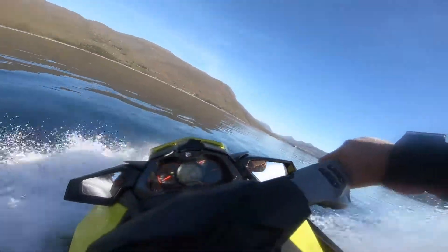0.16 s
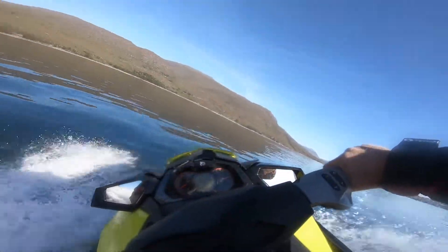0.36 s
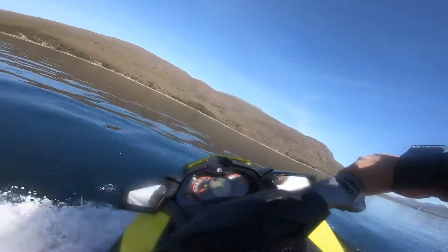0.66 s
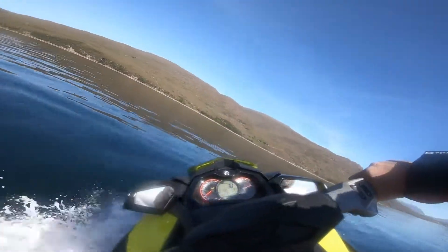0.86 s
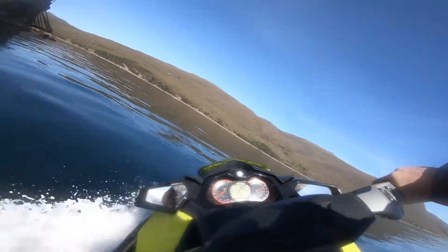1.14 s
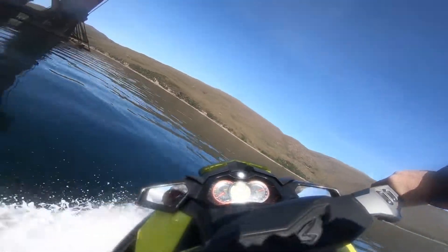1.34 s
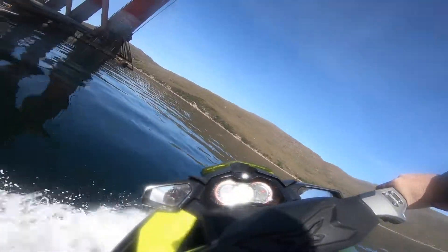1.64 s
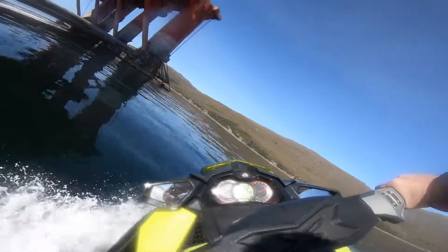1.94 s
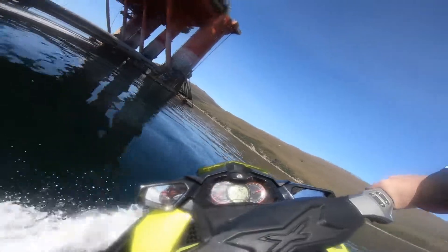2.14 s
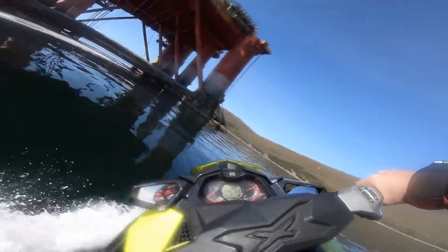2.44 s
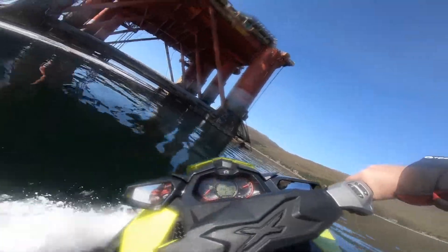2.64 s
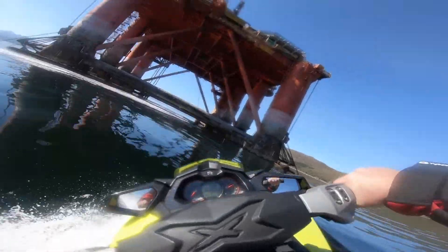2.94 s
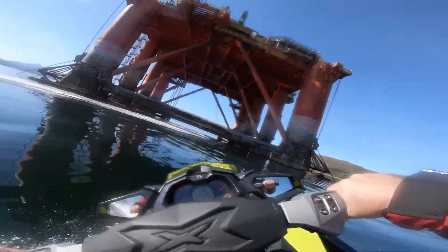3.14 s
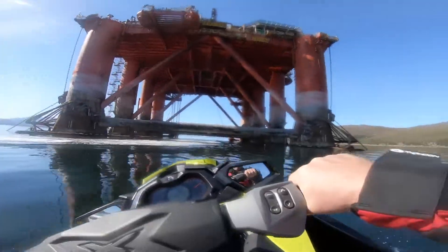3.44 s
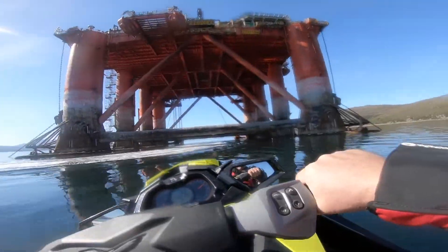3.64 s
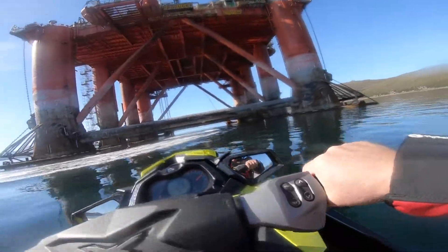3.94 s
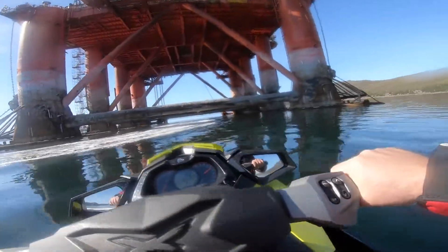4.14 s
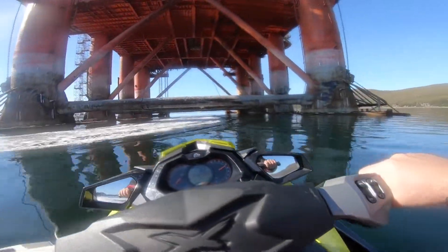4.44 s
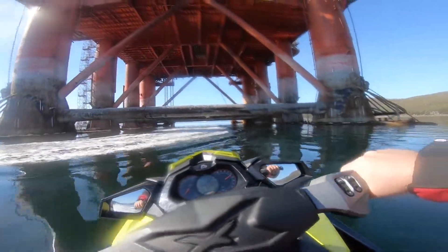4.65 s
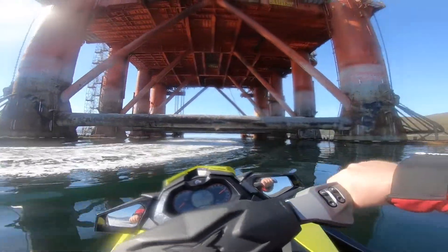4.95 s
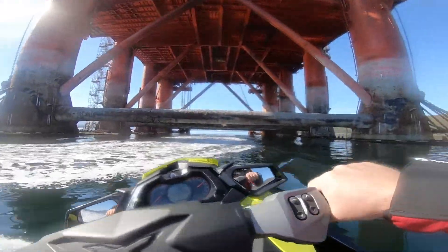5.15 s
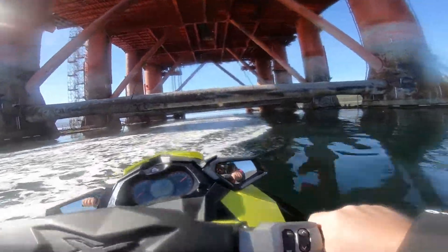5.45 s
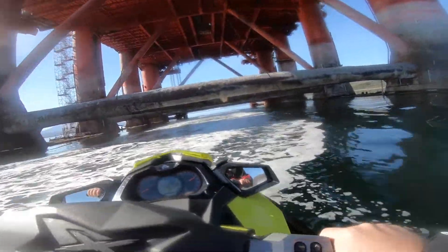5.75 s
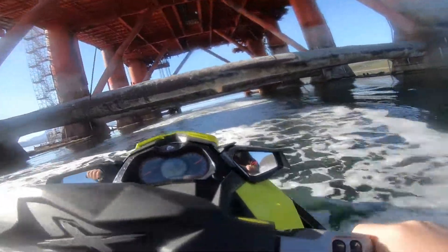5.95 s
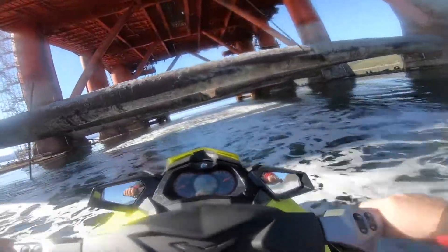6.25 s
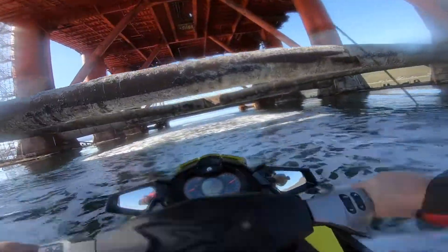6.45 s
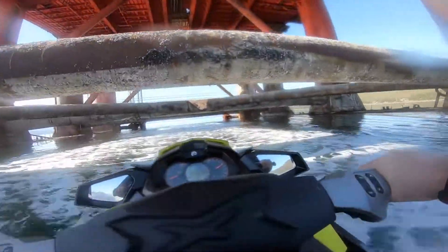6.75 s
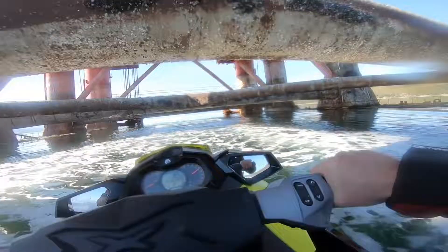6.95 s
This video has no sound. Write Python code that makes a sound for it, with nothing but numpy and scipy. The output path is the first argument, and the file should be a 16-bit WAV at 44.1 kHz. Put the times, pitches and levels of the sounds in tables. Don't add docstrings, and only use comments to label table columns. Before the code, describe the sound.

Low gusty wind and tumbling wash open over an uneven engine note, its deep tone surging and sinking as the pump catches air. Small slaps knock the hull until it rolls upright. Then a steady drone with faint whine and whistling flow, soft spray hiss, one sharp deck rap with bright drops, and closing bubbly gulps. Mono, near and dull, outdoors without echo.

```python
import sys
import numpy as np
from scipy import signal
from scipy.fft import rfft, irfft, next_fast_len
from scipy.io import wavfile

SR = 44100
rng = np.random.default_rng(int(sys.argv[2]) if len(sys.argv) > 2 else 0)


def output_pcm(signal):
    pcm = np.clip(np.atleast_2d(signal).T, -1, 1) * 32767
    wavfile.write(sys.argv[1], SR, np.round(pcm).astype(np.int16))


def linear_from_db(decibels):
    return 10 ** (np.asarray(decibels, float) / 20)


N = 313017
TIME = np.arange(N) / SR


def rms_one(x):
    return x / np.sqrt(np.mean(x ** 2) + 1e-20)


def in_time(rows):
    s, *columns = np.transpose(rows)
    return [np.interp(TIME, s, column) for column in columns]


def swell(depth_db, rate):
    r = np.exp(-80 * np.pi * rate / SR)
    draws = rng.standard_normal(N // 40 + 2002)
    slow = signal.lfilter([1], [1, -2 * r, r * r], draws)[2000:]
    return np.interp(np.arange(N) / 40, np.arange(len(slow)), linear_from_db(depth_db * rms_one(slow)))


def spells(rows, edge_s):
    s = np.arange(0, N + 40, 40) / SR
    gain = 0
    for start, length, db in rows:
        inside = np.minimum(s - start, start + length - s)
        gain = gain + linear_from_db(db) * np.clip(inside / edge_s + .5, 0, 1) ** 2
    return np.interp(TIME, s, gain)


def ring(clicks, hz, t60):
    r = linear_from_db(-60 / (t60 * SR))
    w = 2 * np.pi * hz / SR
    return signal.lfilter([0, np.sin(w)], [1, -2 * r * np.cos(w), r * r], clicks + 1e-18)


def filtered(x, order, hz, kind="low"):
    return signal.sosfilt(signal.butter(order, hz, kind, fs=SR, output="sos"), x)


def coloured(spectrum, shared_db, own_db, rate):
    size = next_fast_len(N)
    hz = np.maximum(np.fft.rfftfreq(size, 1 / SR), 1)
    points = np.array(spectrum)
    height_db = np.interp(np.log(hz), np.log(points[:, 0]), points[:, 1], -150, -150)
    shaped = rfft(rng.standard_normal(N), size) * linear_from_db(height_db)
    together = swell(shared_db, rate)
    place = 2 * np.log2(hz)
    first, last = int(2 * np.log2(points[0, 0])), int(2 * np.log2(points[-1, 0])) + 1
    out = 0
    for centre in range(first, last + 1):
        part = irfft(shaped * np.maximum(1 - np.abs(place - centre), 0), size)[:N]
        out = out + part * swell(own_db, rate)
    return rms_one(out * together)


# time in seconds, speed in turns per s, lean from 0 to 1.
SHAFT = [(0, 43.3, 1), (.3, 43.6, 1), (.75, 46.2, 1), (1.2, 46.5, 1), (1.45, 46.95, 1), (2.5, 47, 1),
         (2.65, 46.5, 1), (3, 47.05, 1), (3.2, 47.8, .4), (3.45, 47.65, 0), (3.6, 47.9, 0), (4.5, 47.9, 0),
         (4.65, 48.05, 0), (5.2, 47.85, 0), (5.55, 48.15, 0), (6.45, 48.45, 0), (6.62, 48.2, 0),
         (7.1, 48.45, 0)]
AERATED_DB = -9


def shaft():
    speed, lean = in_time(SHAFT)
    turn = 2 * np.pi * np.cumsum(speed * swell(.02, 7)) / SR
    return turn, lean


# time in seconds, blade tone in dB.
GRIP = [(0, -36), (.18, -10), (.5, -30), (.9, -34.5), (2.3, -18.5), (2.6, -30), (3.0, -24), (3.3, -21.5),
        (3.46, -18.5), (3.7, -19.5), (4.2, -16.5), (4.62, -20), (4.75, -25), (5.04, -18), (5.25, -28.5),
        (5.4, -21), (6.7, -20.5), (7.0, -32)]
# start in seconds, length in seconds, blade tone in dB.
BITES = [
    (.68, 0.068, -27),
    (1.35, 0.17, -27),
    (1.58, 0.3, -32),
    (2.3, 0.059, -29),
    (2.76, 0.069, -25.5),
    (6.91, 0.07, -21),
]
# start in seconds, length in seconds, level in dB.
SURGES = [(0, 0.56, -28), (2.5, 0.13, -29), (3.1, 0.14, -43), (3.27, 0.22, -33.5), (3.5, 0.37, -22.5),
          (4.38, 0.15, -27), (4.7, 0.055, -35), (4.89, 0.23, -25), (5.18, .12, -18.5), (5.35, 0.096, -27),
          (5.72, 0.13, -27), (6.03, 0.45, -30.5), (6.36, 0.36, -30), (6.57, 0.31, -25.5),
          (6.88, 0.071, -23.5)]


def blade_tones(turn, lean):
    blade = linear_from_db(in_time(GRIP)[0] + AERATED_DB * lean) + spells(BITES, edge_s=.05)
    blade = blade * swell(1.8, 18)
    double = linear_from_db(-34.5) + spells(SURGES, edge_s=.041)
    double = double * linear_from_db(AERATED_DB * lean / 2) * swell(2.2, 14)
    return blade * np.sin(3 * turn) + double * np.sin(6 * turn + 1)


# multiple of shaft speed, level in dB.
UNEVEN = [(2, -12), (4, -5), (5, -3), (7, -23.5), (8, -24)]
# start in seconds, length in seconds, level in dB.
HUNTING = [
    (0, 0.048, -29),
    (.68, 0.18, -22),
    (3.08, 0.17, -25.5),
    (3.3, 0.77, -26),
    (5.0, 0.05, -34.5),
    (5.22, .1, -36),
    (6.98, 0.067, -35),
]


def uneven_firing(turn, lean):
    running_db, leaning_db = -34, -28
    level = linear_from_db(running_db + (leaning_db - running_db) * lean) + spells(HUNTING, edge_s=.11)
    out = 0
    for order, db in UNEVEN:
        out = out + linear_from_db(db) * swell(2, 2.5) * np.sin(round(order) * turn + rng.uniform(0, 2 * np.pi))
    return level * linear_from_db(AERATED_DB * lean) * out


# multiple of shaft speed, running level in dB, leaning level in dB.
WHINE = [(9, -1.5, -10), (10, -2.5, -1.5), (11, -8.5, -12.5), (12, -16.5, -3), (13, -13, -12),
         (15, -12, -13), (16, -11.5, -9.5), (18, -16, -10), (19, -14.5, -8), (20, -30.5, -18),
         (21, -20.5, -17.5), (22, -16, -13), (24, -18, -24.5), (26, -14.5, -23), (27, -19, -26),
         (28, -19.5, -26.5), (30, -25, -31.5), (34, -27.5, -27.5), (36, -20.5, -24), (37, -22.5, -23.5),
         (41, -24, -22)]
# start in seconds, length in seconds, level in dB.
LOADS = [
    (0, 0.016, -19.5),
    (1.3, 1.2, -50),
    (3.92, 0.75, -46),
    (4.95, 0.7, -47),
    (5.7, 0.63, -49.5),
]


def pump_whine(turn, lean):
    level = (linear_from_db(-44) + spells(LOADS, edge_s=.12)) * swell(1.4, 13)
    out = 0
    for order, running_db, leaning_db in WHINE:
        height = linear_from_db(running_db) + (linear_from_db(leaning_db) - linear_from_db(running_db)) * lean
        tone = np.sin(round(order) * turn + rng.uniform(0, 2 * np.pi))
        out = out + height * swell(1.6, 3) * tone
    return level * out


# start in seconds, length in seconds, level in dB.
FULL_PUMP = [
    (3.92, 0.91, -40),
    (4.95, 0.74, -46),
    (5.7, 1, -49),
]


def full_pump(turn):
    second = linear_from_db(11) * swell(2.1, 2.7) * np.sin(2 * turn)
    return spells(FULL_PUMP, edge_s=.12) * (np.sin(12 * turn) + second)


# time in seconds, level in dB.
GUST = [(0, -16.5), (.16, -17.5), (.6, -19), (.87, -17), (1.2, -25), (1.9, -24), (2.05, -19.5),
        (2.5, -20.5), (2.9, -17), (3.2, -25.5), (3.5, -27.5), (4.05, -25.5), (4.8, -22.5), (5.08, -24),
        (5.9, -24.5), (6.55, -27), (6.9, -22.5), (7.1, -22.5)]
# frequency in Hz, density in dB per Hz.
BUFFET = [(8.8, -48), (15, -12), (81, -3), (102, 0.5), (140, -9), (180, -22), (310, -120)]


def wind():
    lumps = swell(1.5, 18)
    return linear_from_db(in_time(GUST)[0]) * lumps * coloured(BUFFET, shared_db=.4, own_db=.4, rate=25)


# time in seconds, drumming level in dB.
CHOP = [(0, -24.5), (.3, -23), (.9, -22.5), (1.1, -23), (1.5, -20.5), (2.0, -20.5), (2.6, -20.5),
        (3.0, -25), (3.3, -25), (3.7, -20), (4.3, -27.5), (4.9, -23.5), (5.28, -21.5), (5.6, -26.5),
        (6.2, -23), (6.6, -19.5), (6.9, -21), (7.1, -20.5)]
# frequency in Hz, density in dB per Hz.
DRUM = [(110, -42), (135, -0.5), (180, 1.5), (260, -2), (330, -7), (400, -26)]


def drumming():
    lumps = swell(1.5, 24)
    return linear_from_db(in_time(CHOP)[0] - 2.0) * lumps * coloured(DRUM, shared_db=-0.1, own_db=1.33, rate=26)


# time in seconds, level in dB.
FLOW = [(0, -36), (.2, -40.5), (.67, -41), (1.1, -47.5), (1.5, -45), (2.1, -41), (2.9, -39), (3.4, -42),
        (4.3, -39), (4.93, -38.5), (5.15, -38), (5.28, -34.5), (5.4, -37), (5.87, -36), (6.25, -38),
        (6.55, -35), (7.03, -38), (7.1, -33)]
# frequency in Hz, density in dB per Hz.
WASH = [(260, -14), (330, -1.5), (383, 0.5), (466, -4.5), (516, -3.5), (663, -10), (800, -26), (950, -32.5)]


def wash(lean):
    (flow_db,), (chop_db,) = in_time(FLOW), in_time(CHOP)
    wake_db = 9.5 * np.exp(-TIME ** 4)
    lull_db = -0.5 * np.exp(-((TIME - 3.2) / .3) ** 2)
    level_db = flow_db.mean() + 8.5 + 1.5 * (flow_db - flow_db.mean())
    level_db = level_db + 0.14 * (chop_db - chop_db.mean())
    level_db = level_db - 5.5 * lean + wake_db + lull_db
    return linear_from_db(level_db - 4.5) * swell(-1, 23) * coloured(WASH, shared_db=2.0, own_db=-2.0, rate=38)


# frequency in Hz, density in dB per Hz.
RUSH = [(560, -25), (720, 0), (885, 1), (1130, -4), (1750, -6.5), (2000, -11), (2300, -13.5), (3050, -22.5),
        (3900, -39)]


def rush(turn):
    throb = 1 + .15 * np.sin(turn) + .12 * np.sin(3 * turn)
    return linear_from_db(in_time(FLOW)[0] - 3.5) * throb * coloured(RUSH, shared_db=-0.54, own_db=0.8, rate=16)


# time in seconds, hiss in dB, fine mist relative to it in dB.
SPRAY = [(0.04, -56, -25), (0.47, -61, -27.5), (1.3, -59.5, -21), (2.0, -57, -24), (2.75, -58.5, -20),
         (3.35, -60.5, -23), (3.7, -57.5, -14.5), (3.91, -55.5, -10), (4.74, -55, -10), (4.95, -51, -5),
         (5.07, -55, -8), (5.27, -51, -8), (5.4, -57, -8), (5.82, -53.5, -14), (6.25, -56.5, -18),
         (6.58, -49.5, -12.5), (6.9, -55.5, -18), (7.09, -50, -20)]
# frequency in Hz, density in dB per Hz.
HISS = [(2600, 3.5), (3100, -1), (4000, 2.5), (5200, 1), (6800, -1), (8000, -7.5), (9200, -21),
        (10200, -26.5), (11000, -35.5)]
# frequency in Hz, density in dB per Hz.
MIST = [(7000, -8.5), (8600, -3.5), (10000, -14.5), (11000, -15.5), (11300, -24), (11500, -80),
        (14500, -89)]


def spray():
    hiss_db, mist_db = in_time(SPRAY)
    hiss = coloured(HISS, shared_db=-0.63, own_db=0.96, rate=15)
    mist = linear_from_db(mist_db) * coloured(MIST, shared_db=.5, own_db=.5, rate=18)
    return linear_from_db(hiss_db) * (hiss + mist)


# time in seconds, level in dB.
FIZZ = [(3.95, -101), (4.4, -95), (4.47, -84), (4.95, -66.5), (5.066, -68), (5.134, -64), (5.212, -70),
        (5.268, -60), (5.286, -71), (5.6, -74), (5.63, -90), (6.0, -106)]
# start in seconds, length in seconds, level in dB.
VEIL = [(0, .04, -82), (.09, .012, -89), (1.13, .012, -89), (1.53, .01, -95), (2.0, .012, -91),
        (2.41, .012, -92), (2.65, .01, -94), (2.73, .012, -90), (2.8, .012, -90), (2.88, .012, -90),
        (3.05, .01, -94), (3.18, .012, -90), (3.47, .48, -88), (6.4, .4, -93), (7.0, .012, -90)]
# frequency in Hz, density in dB per Hz.
DROPLETS = [(11500, -21), (12000, 4.5), (13500, 3), (15000, -8), (15750, -17)]


def fizz():
    in_foam = (TIME > FIZZ[0][0]) & (TIME < FIZZ[-1][0])
    level = in_foam * linear_from_db(in_time(FIZZ)[0]) + spells(VEIL, edge_s=.01)
    return level * coloured(DROPLETS, shared_db=.5, own_db=.5, rate=18)


# start in seconds, length in seconds, level in dB.
SHEETS = [(0, 0.11, -59), (.45, .3, -72), (1.85, 0.25, -58.5), (2.1, 0.29, -65), (2.5, .5, -66),
          (4.8, .25, -76), (5.28, 0.22, -67), (5.75, .3, -52.5), (6.05, 0.11, -58), (6.45, .15, -58.5),
          (6.72, 0.34, -52), (7.03, .1, -45)]
# start in s, length in s, pitch in Hz, width in Hz, level in dB.
HOLLOWS = [
    (3.9, 1.2, 1280, 67, -50),
    (4.4, 0.74, 890, 80, -52),
    (3.6, 2, 1750, 88, -59),
    (1.5, 1.2, 850, 57, -51),
]


def sheets():
    white = rng.standard_normal(N)
    falling = rms_one(filtered(white, 2, [1700, 3100], "band"))
    out = spells(SHEETS, edge_s=.18) * swell(1.5, 14) * falling
    for start, length, hz, width_hz, db in HOLLOWS:
        breath = filtered(white, 1, [hz - width_hz / 2, hz + width_hz / 2], "band")
        out = out + spells([(start, length, db)], edge_s=.12) * rms_one(breath)
    return out


# time in seconds, peak level in dB.
SPLASHES = [
    (0.0, -40),
    (0.141, -56),
    (2.155, -52),
    (5.264, -21.5),
    (5.292, -31),
    (5.3154, -40),
    (6.48, -36.5),
    (7.094, -31.5),
]


def splashes():
    s, peak_db = np.transpose(SPLASHES)
    bursts = np.zeros(N)
    bursts[(s * SR).astype(int)] = linear_from_db(peak_db - 9.0)
    fading = signal.lfilter([1], [1, -linear_from_db(-60 / (0.061 * SR))], bursts)
    return filtered(fading * rng.standard_normal(N), 3, [4000, 8600], "band")


def patter():
    ends_s, fades_s, knocks_per_s = 3.0, .3, 700
    rate = knocks_per_s * np.clip((ends_s - TIME) / fades_s, 0, 1)
    born = np.flatnonzero(rng.random(N) < rate / SR)
    sizes = linear_from_db(4 * np.minimum(rng.exponential(1, len(born)), 2.2)) * rng.choice([-1, 1], len(born))
    pitches = np.geomspace(420, 1900, 8)
    dealt = rng.integers(0, len(pitches), len(born))
    out = 0
    for k, hz in enumerate(pitches):
        clicks = np.zeros(N)
        clicks[born[dealt == k]] = sizes[dealt == k] * linear_from_db(-7.0 * np.log2(hz / 420))
        out = out + ring(clicks, hz, t60=7.4 / hz)
    return linear_from_db(-40.0) * filtered(rms_one(out), 2, 2500)


# time in seconds, peak in dB, thud relative to it in dB, brightness in dB per octave.
SLAPS = [(0.074, -23, 3, 5), (0.088, -16, -6, 0), (0.142, -21.5, -33, 7), (0.424, -29.5, -9, -3),
         (0.531, -26, -2, -11), (0.614, -23.5, -18, 3), (0.709, -23, 1, -8), (0.747, -23.5, 1, -6),
         (0.774, -31, -9, -10), (0.926, -26.5, 6, -12), (0.974, -31.5, 3, -13), (1.125, -29.5, -8, -14.5),
         (1.295, -29.5, -4, -18.5), (1.386, -25, 10, -1), (1.503, -33, -10, -13), (1.669, -26, -4, -11),
         (1.679, -27.5, -8, -2), (1.79, -25.5, -6, -3), (1.811, -31, -5, -5), (1.87, -32, -1, -4),
         (1.972, -30.5, -12, -10), (2.155, -18, -2, -5), (2.231, -26.5, 7, -12), (2.252, -26, -5, -8),
         (2.409, -28, -5, -1), (2.441, -29, -12, 4), (2.672, -25, -5, -2), (2.8, -21, 1, 0),
         (5.263, -26, 19, 5), (5.986, -24, -7, 3), (6.125, -33, -12, -14), (6.839, -22, -10, 4)]
# pitch in Hz, level in dB, t60 in seconds.
PANELS = [(490, 7, 0.017), (646, -7.5, 0.011), (696, 8.5, 0.013), (920, 4, 0.017), (1130, 3.5, 0.016),
          (1340, -10, 0.037), (1620, -8.5, 0.016), (1900, -10, 0.015), (2284, -18.5, 0.015)]


def slaps():
    s, peak_db, thud_db, bright_db = np.transpose(SLAPS)
    at = (s * SR).astype(int)
    spread = rng.standard_normal((len(at), len(PANELS)))
    late = rng.random((len(at), len(PANELS), 3)) * [.0035, .01, .02] * SR
    out = np.zeros(N)
    for k, (hz, db, t60) in enumerate(PANELS):
        clicks = np.zeros(N)
        height = linear_from_db(peak_db + db - 10.5 + bright_db * np.log2(hz / 1000) + spread[:, k])
        height = height * np.sign(spread[:, k - 1])
        for touch in range(3):
            wait = late[:, k, :touch + 1].sum(axis=1).astype(int)
            clicks[at + wait] += height * linear_from_db(-3.5 * touch)
        out += ring(clicks, hz, t60)
    thuds = np.zeros(N)
    thuds[at + int(.005 * SR)] = linear_from_db(peak_db + thud_db)
    thuds = filtered(thuds + 1e-18, 2, 700)
    out += ring(thuds, 220, 0.035) + ring(thuds, 330, 0.043)
    return filtered(out, 3, 2400)


def slosh():
    s, peak_db = np.transpose(SLAPS)[:2]
    rise_s, t60_s = 0.0039, 0.053
    bursts = np.zeros(N)
    bursts[(s * SR).astype(int)] = linear_from_db(peak_db - 12.5)
    fading = signal.lfilter([1], [1, -linear_from_db(-60 / (t60_s * SR))], bursts + 1e-18)
    rise = np.exp(-1 / (rise_s * SR))
    puff = signal.lfilter([1 - rise], [1, -rise], fading)
    return filtered(2.38 * puff * rng.standard_normal(N), 2, [450, 1700], "band")


# start in seconds, first pitch in Hz, last pitch in Hz, length in s, level in dB.
GULPS = [
    (5.261, 124, 130, 0.025, -10),
    (6.635, 1680, 1770, 0.054, -41),
    (6.691, 1300, 1155, .06, -38),
    (7.055, 1423, 1570, 0.036, -34.5),
    (6.80, 95, 114, 0.11, -15),
    (6.88, 128, 206, 0.12, -15),
    (6.94, 386, 490, 0.099, -22.5),
    (7.0, 121, 139, 0.046, -13),
    (7.05, 128, 189.5, 0.072, -10.5),
    (7.06, 488, 585, 0.069, -25),
]


def gulps():
    out = np.zeros(N)
    for s, start_hz, end_hz, length, db in GULPS:
        part = np.linspace(0, 1, int(length * SR))
        phase = 2 * np.pi * np.cumsum(start_hz + (end_hz - start_hz) * part) / SR
        wave = np.sin(phase) * np.sin(np.pi * part)
        at = int(s * SR)
        out[at:at + len(wave)] += linear_from_db(db) * wave[:N - at]
    return out


# pitch in Hz, level in dB, t60 in seconds.
DECK = [(504, 4, 0.036), (934, -12, 0.028), (1168, 0, 0.025), (1390, -10, 0.012), (1730, -7, .022),
        (2040, -6, .018)]


def knock():
    at_s, level_db = 5.2635, -14
    out = np.zeros(N)
    for hz, db, t60 in DECK:
        clicks = np.zeros(N)
        clicks[int((at_s + 1.5 / hz) * SR)] = linear_from_db(level_db + db)
        out += ring(clicks, hz, t60)
    return filtered(out, 2, 2800)


def muffled(x):
    return filtered(x, 6, 4200)


def scene():
    turn, lean = shaft()
    tones = blade_tones(turn, lean) + uneven_firing(turn, lean) + pump_whine(turn, lean) + full_pump(turn)
    water = drumming() + wash(lean) + rush(turn)
    drops = spray() + fizz() + splashes()
    hits = patter() + slaps() + gulps()
    dull_sounds = muffled(sheets() + slosh() + knock())
    mix = np.sqrt(2) * tones + wind() + water + drops + hits + dull_sounds
    return mix[None]


def low_pass(x):
    return signal.sosfilt(signal.butter(12, 15750, fs=SR, output="sos"), x)


def record(dry):
    mix = .9 * np.tanh(dry / .9)
    return low_pass(mix)


dry = scene()
out = record(dry)
output_pcm(out)
```